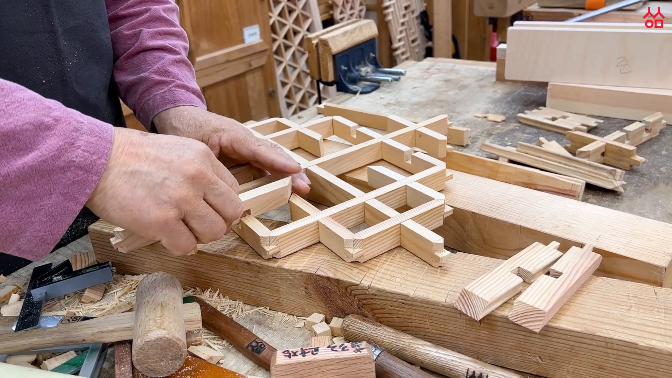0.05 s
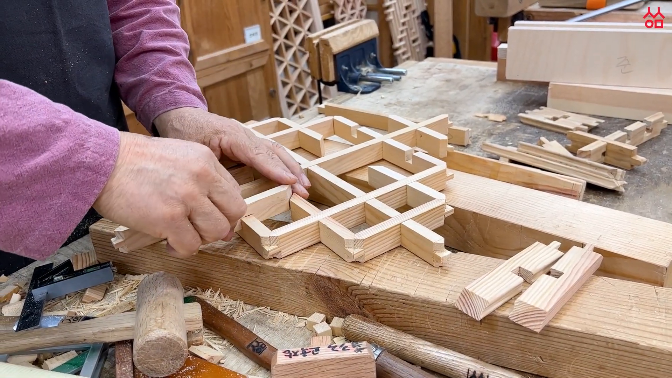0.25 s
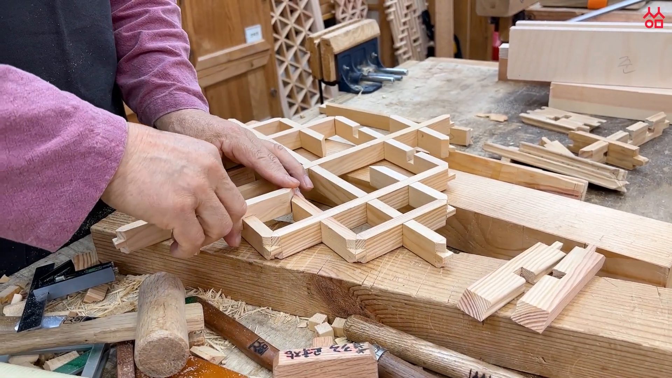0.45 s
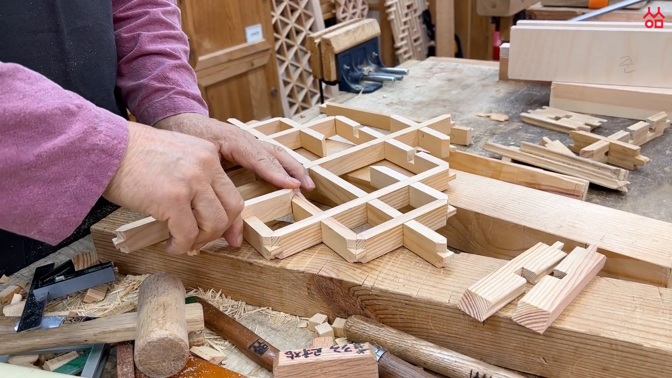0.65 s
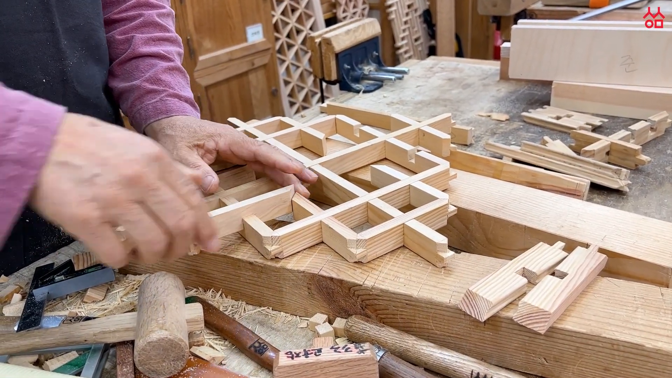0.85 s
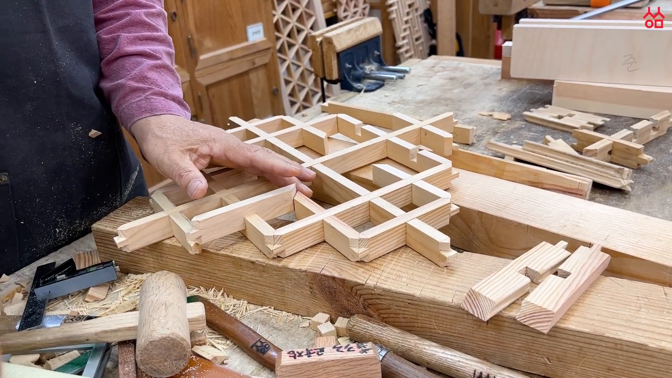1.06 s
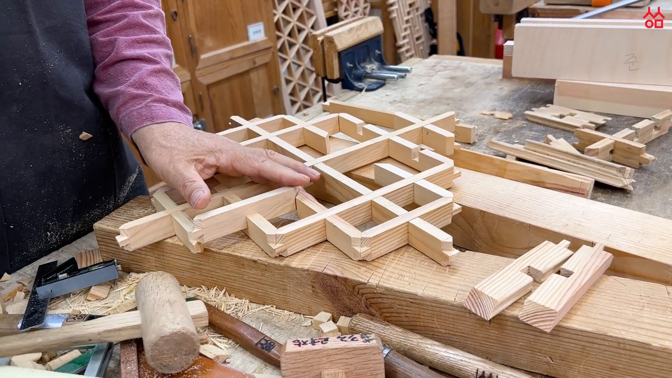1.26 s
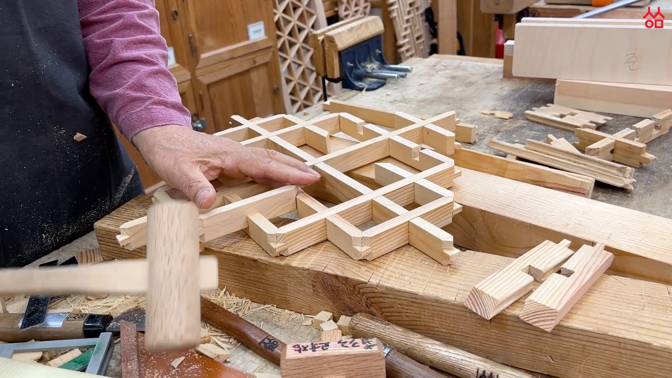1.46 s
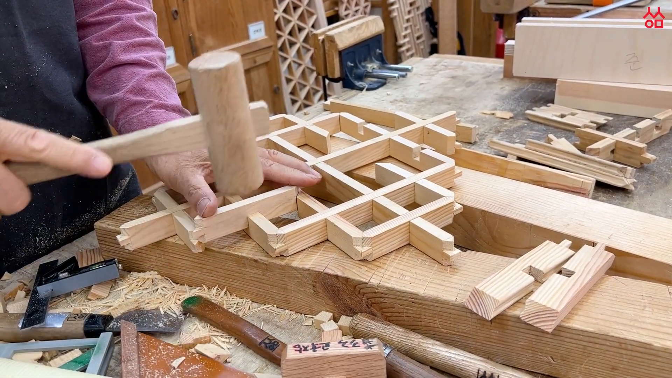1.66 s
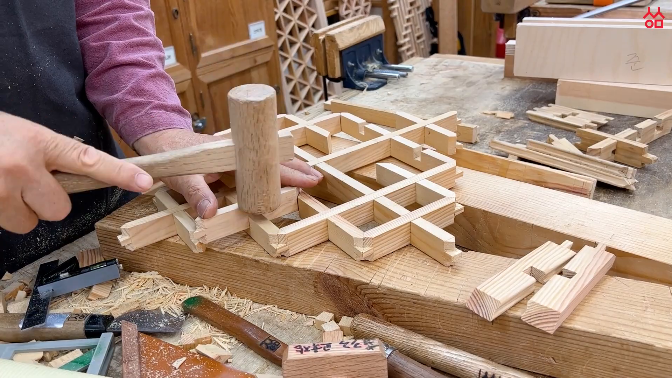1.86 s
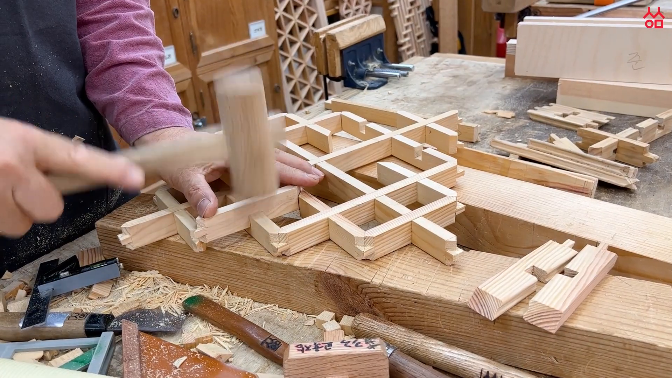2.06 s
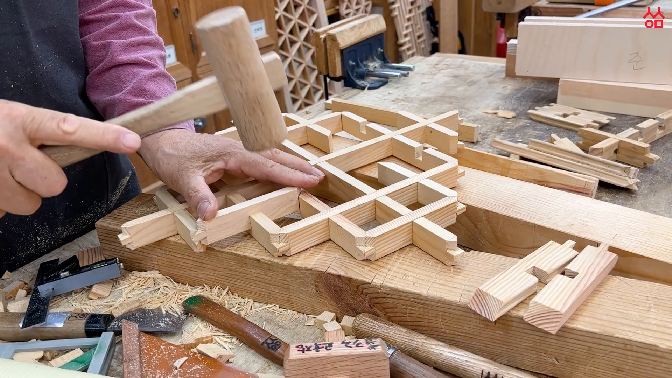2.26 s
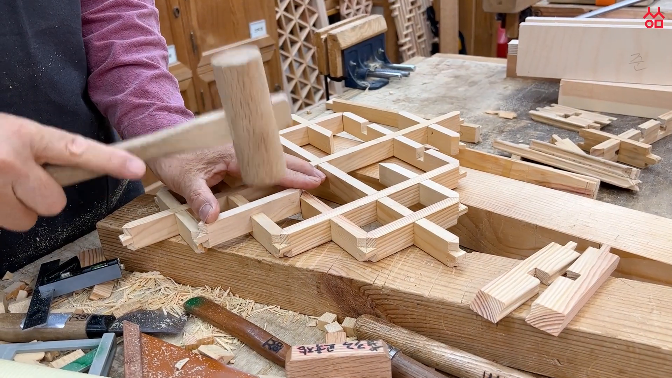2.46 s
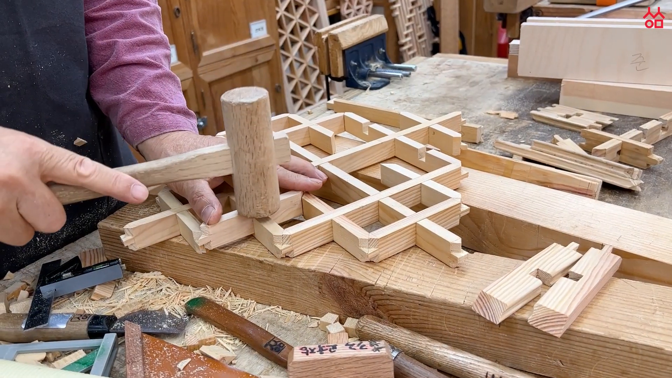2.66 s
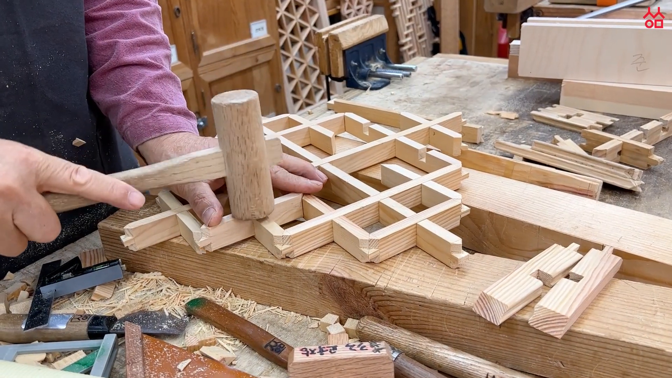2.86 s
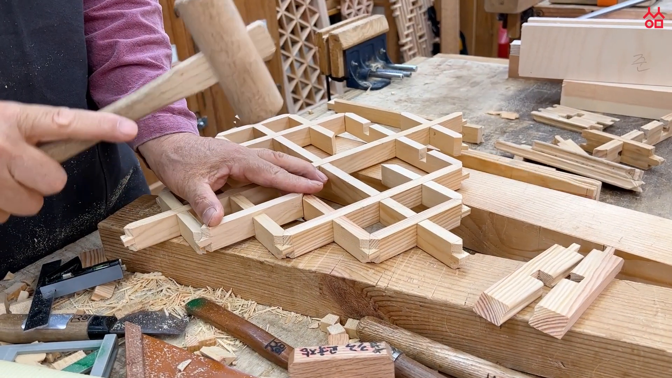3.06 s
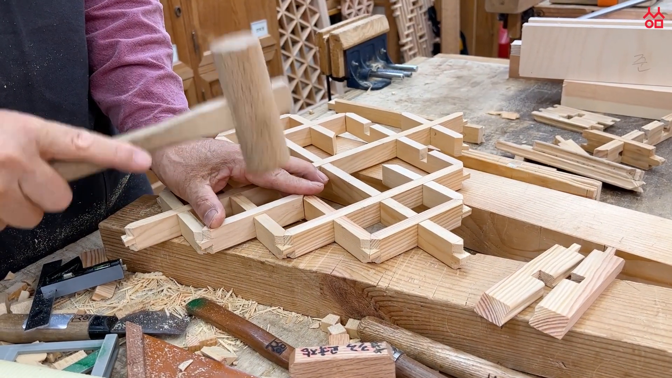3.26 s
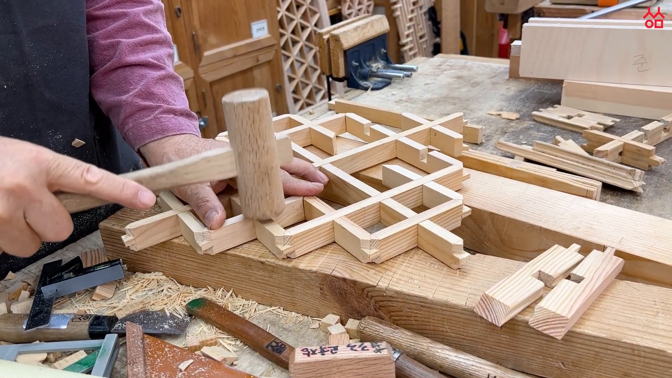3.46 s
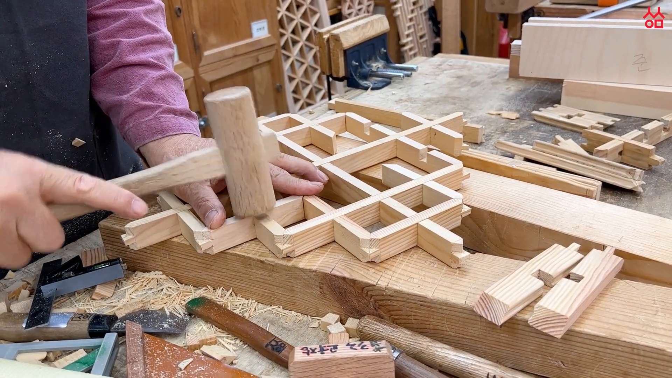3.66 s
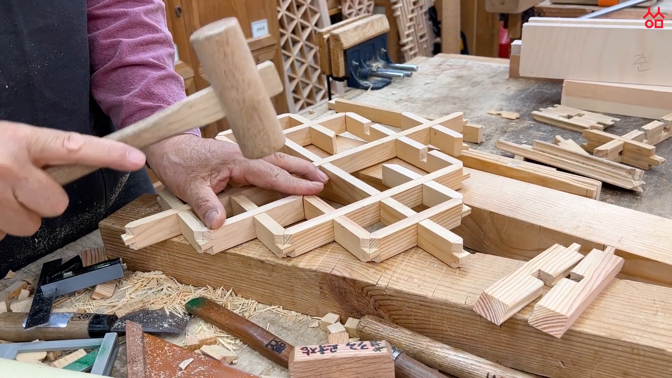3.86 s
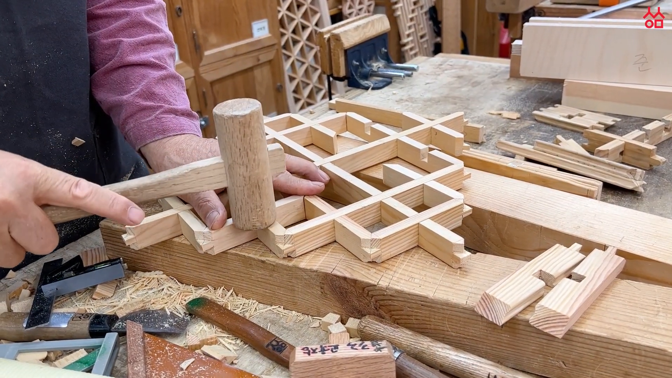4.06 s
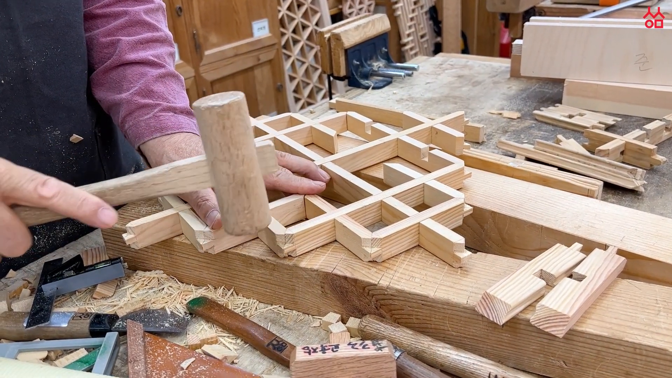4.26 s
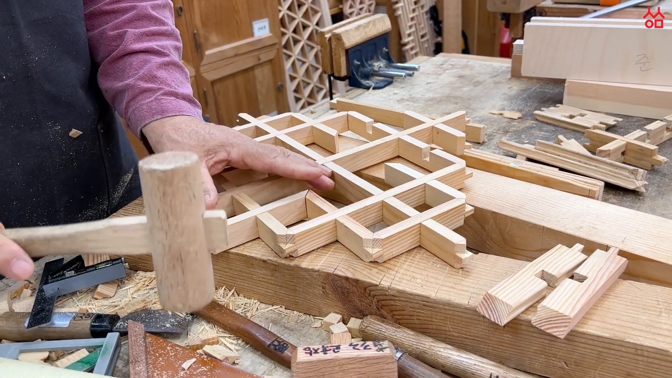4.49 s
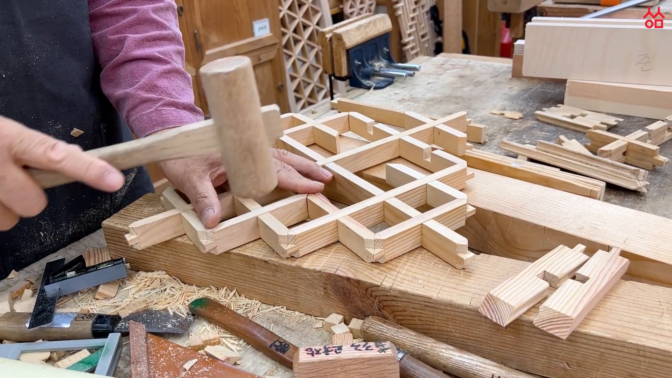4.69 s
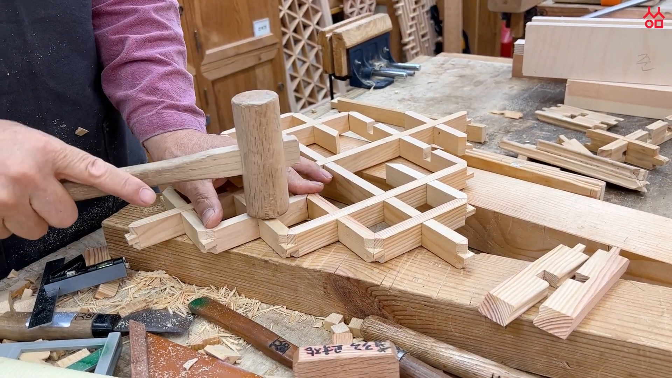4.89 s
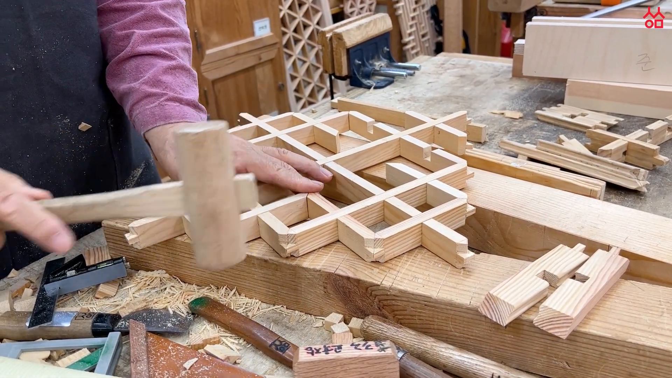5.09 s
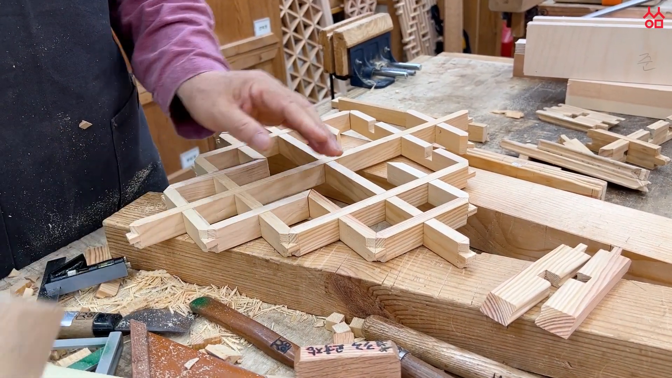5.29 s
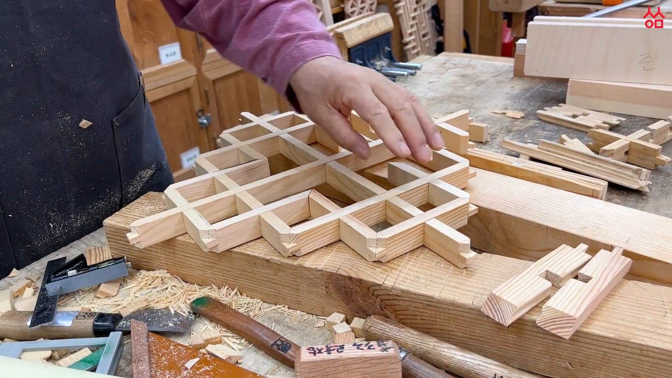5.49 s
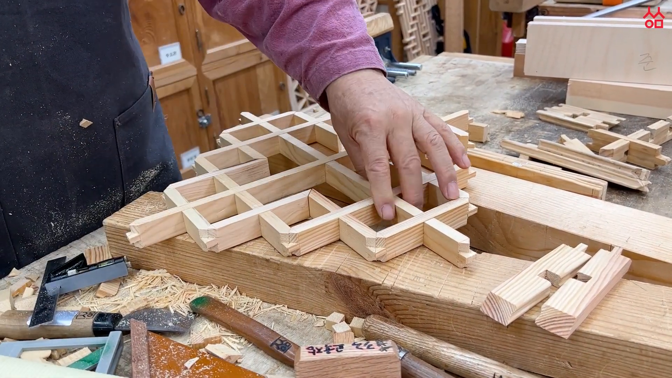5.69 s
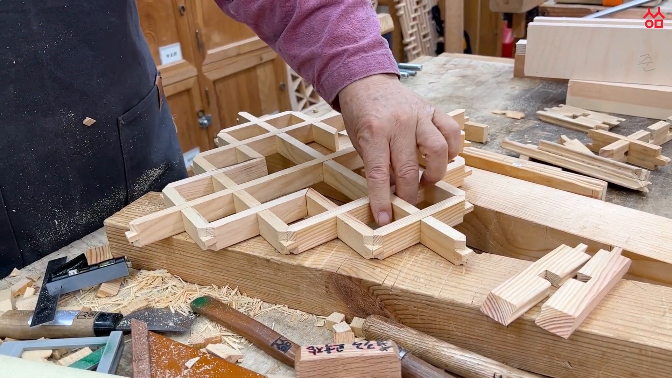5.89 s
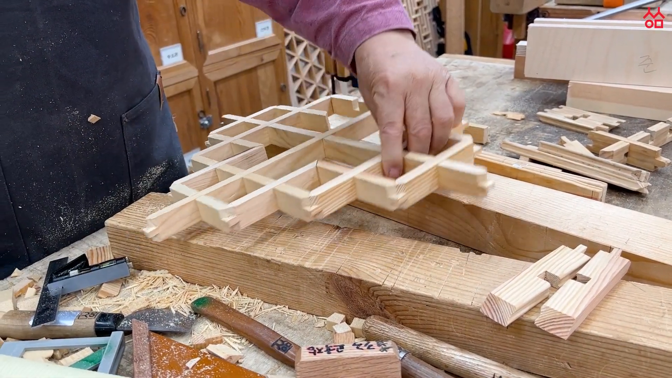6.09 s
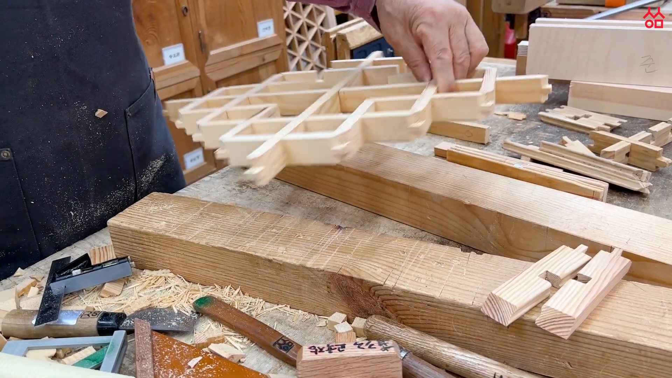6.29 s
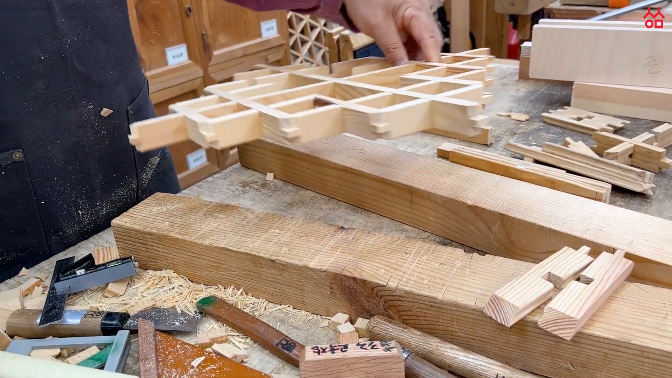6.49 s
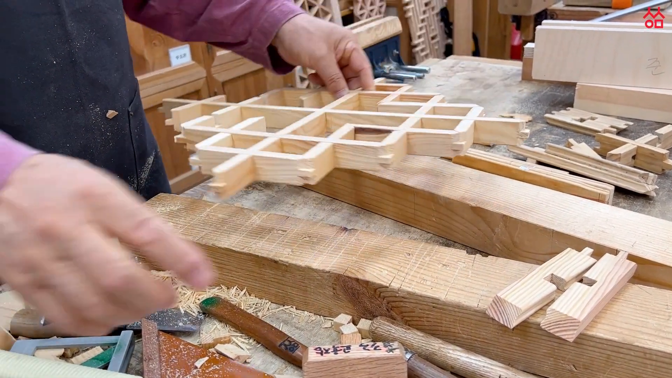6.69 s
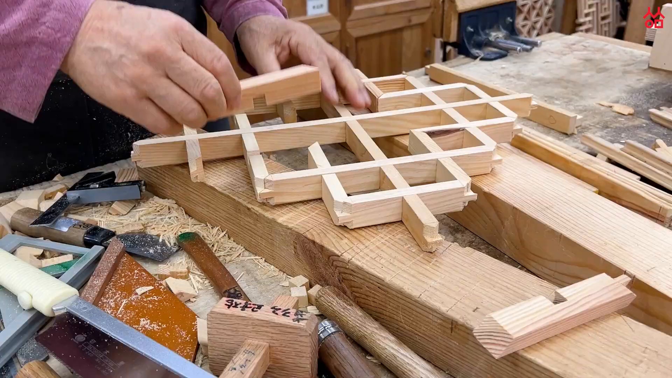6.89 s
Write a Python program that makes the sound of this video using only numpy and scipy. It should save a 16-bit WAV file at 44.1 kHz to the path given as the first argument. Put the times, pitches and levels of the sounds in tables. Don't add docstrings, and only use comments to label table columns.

```python
import sys
import numpy as np
from scipy import signal
from scipy.fft import rfft, irfft
from scipy.io import wavfile
from scipy.ndimage import uniform_filter1d

SR = 44100
rng = np.random.default_rng(int(sys.argv[2]) if len(sys.argv) > 2 else 0)


def to_wav(s):
    ch = np.atleast_2d(s).T
    pcm = np.round(np.clip(ch, -1, 1) * 32767)
    wavfile.write(sys.argv[1], SR, pcm.astype(np.int16))


def ratio_of_db(decibels):
    return 10 ** (np.asarray(decibels, float) / 20)


N = 306054

# frequency in Hz, level in dB per Hz.
AIR = [(18, -42.5), (30, -20.5), (154, -2), (306, -1), (359, -7.5), (420, -1), (979, -6.5), (3570, -7.5),
       (6720, -16.5), (8760, -26.5), (9480, -23.5), (10500, -28.5), (16500, -44.5)]
# frequency in Hz, width in Hz, level in dB.
WHINE = [(5500, 65, -10.5), (6050, 100, -7), (7660, 130, -2), (8660, 270, 5), (10300, 62, -10.5),
         (12530, 58, -27.5), (13500, 110, -35)]
# time in seconds, whine in dB above the air.
MACHINE_LOAD = [(0, -10), (.5, -13.5), (.72, -28), (.9, -27), (1.1, -10.5), (2.5, -12.5), (4.4, -11),
                (5.27, -11.5), (6.3, -9), (6.55, -16), (6.75, -30), (6.94, -27)]
# start in seconds,
# background level in dB, # drift in dB per s.
STRETCHES = [
    (0, -59, 1.5),
    (1.581, -67.5, 0),
    (5.279, -55, -2),
]
# start in seconds, length in seconds, level in dB, centre in Hz, duller part in dB.
RUBS = [(-.05, 0.63, -59, 2140, -8.5), (0.741, 0.22, -46.5, 2780, -4.5), (0.901, 0.18, -56, 2380, -3),
        (1.189, 0.34, -50.5, 2200, -17), (4.4, 0.3, -68.5, 2070, 0), (5.7, 0.6, -57.5, 2100, -7),
        (6.618, .7, -60, 1430, 1.5)]
# start in seconds, end in seconds, frequency in Hz, level in dB.
SQUEAK = (.9, 1.08, 5450, -65)
# time in seconds, level in dB.
CHISEL_HITS = [(5.630, -35.5), (5.676, -37.5)]
GAUGE_HITS = [(5.931, -28), (5.981, -39.5), (6.013, -46)]
# frequency in Hz, level in dB, 60 dB decay in seconds.
CHISEL_MODES = [(5980, 1.5, 0.3), (7670, -11, 0.52), (9600, -7, 0.31), (10560, -13, 0.21),
                (8900, -12, 0.11)]
GAUGE_MODES = [(2260, -1.5, 0.4), (3760, -4.5, 0.14), (1860, 20.5, 0.03), (907, 0.5, 0.095)]
# frequency in Hz, level in dB, 60 dB decay in seconds.
BEAMS = [(124, -18, 0.88), (185.3, -12.5, 0.85), (259, -3.5, 0.41), (345, -6.5, 0.27), (389.7, 0.5, 0.33),
         (504, -4, 0.17), (674, -5.5, 0.24), (767, -8.5, 0.36)]
# frequency in Hz, level in dB per Hz.
WOOD = [(35, -68.5), (60, -44), (113, -9), (213, -15.5), (252, 20.5), (290, -7), (384, 2.5), (600, -4.5),
        (659, -13), (1270, -15), (4980, -21), (15000, -70), (16500, -80)]
# time in seconds, ring in dB, ring in Hz, thud in dB above the ring.
PADDED = [(1.187, -21, 2500, -28), (1.2, -12, 2450, -27), (1.355, -31.5, 1990, 6), (1.36, -8.5, 2400, -42),
          (1.38, -34.5, 2500, 2), (5.564, -15.5, 845, -10.5), (5.931, 0.5, 1830, -27.5),
          (5.979, -9.5, 1690, -23), (6.011, -9.5, 1820, -23)]
FLAT = [(.001, -31.5, 2210, -16), (.106, -31.5, 2260, -37), (0.207, -27, 2260, -18), (.226, -24, 2360, -29),
        (0.258, -36, 1770, -28), (1.22, -30, 2500, 0), (1.287, -34, 1980, -0.5), (1.312, -16, 2210, -22),
        (1.471, -41, 2160, -5), (5.507, -30.5, 895, 7.5), (5.628, -5, 2135, -9), (5.663, -13.5, 1870, -15),
        (5.84, -27.5, 1210, -17), (5.875, -40.5, 934, -4)]
EDGE = [(0.118, -37, 1730, -17), (.237, -36, 2650, -11), (0.249, -33.5, 1700, -8.5),
        (0.446, -39.5, 1800, -9), (.646, -44.5, 915, -7), (1.165, -37.5, 1990, -3),
        (1.239, -13.5, 1800, -40), (1.249, -15.5, 2030, -17), (1.276, -9.5, 1900, -23),
        (1.338, -19.5, 1890, -16), (5.221, -37.5, 870, -13.5), (6.106, -31.5, 1650, -37)]
TICK = [(1.55, -48, 2070, -4.5), (1.772, -46, 1140, -11.5), (4.649, -52, 1782, -42.5),
        (4.843, -60, 1620, 5), (5.646, -19.5, 1900, -9), (5.674, -23.5, 2110, 1), (5.7, -17, 2150, -56),
        (5.717, -19.5, 2170, -59), (6.537, -45, 910, 3)]
CRISP = [(0.884, -39, 1000, -1), (6.424, -46, 2454, -22), (6.513, -56, 2460, -16), (6.561, -40, 1760, -14)]
# click in Hz, click in dB above the ring, its knocks.
CONTACTS = [
    (3060, -35.5, PADDED),
    (3130, -18, FLAT),
    (3100, -13.5, EDGE),
    (3490, -8.5, TICK),
    (4020, -2, CRISP),
]
# time in
# seconds, bar ring in dB, bar in Hz, click in dB above the bar, seated in dB (more passes to bench and room).
JOINTS = [
    (3357, -19, [(1.847, -8, 1880, -21.5, -4.5), (2.097, -5, 1780, -10.5, -4), (2.363, -5.5, 1770, -9.5, -2)]),
    (5260, -18, [(2.627, -5, 1640, -5.5, -2.5), (2.882, -5, 1604, -5, -1), (3.141, -3.5, 1687, -6, -1.5), (3.418, -3.5, 1800, -7.5, 0.5)]),
    (2800, -19.5, [(3.687, 3.5, 1774, -18, 2.5), (3.933, 3.5, 2042, -12, -1.5)]),
    (3240, -10, [(4.066, -19.5, 1704, -24, -2.5), (4.078, -21.5, 1700, -17, 0)]),
    (2620, -15, [(4.861, -3, 1750, -19.5, -3.5)]),
]
# delay in ms, level in dB.
SLAPS = [(11.5, -17), (16, -19), (19.5, -19), (23, -19), (31, -25)]
# frequency in Hz, 60 dB decay in seconds.
ROOM_T60 = [(60, 0.34), (160, 0.57), (420, 0.52), (1100, 0.46), (2500, 0.36), (4300, 0.44), (5500, 0.25),
            (6600, 0.67), (9000, 0.33), (14000, 0.11)]
# frequency in Hz, level in dB.
ROOM_DB = [(60, -48.5), (110, -33.5), (180, -35), (250, -27), (400, -24.5), (700, -24.5), (1200, -32),
           (1800, -23.5), (2800, -25.5), (4300, -22.5), (5500, -19), (6600, -40.5), (10000, -40.5),
           (15000, -52)]


def level(x, db):
    return x * ratio_of_db(db) / np.sqrt(np.mean(x ** 2))


def along(points, hz):
    points_hz, values = np.array(points).T
    return np.interp(np.log(np.maximum(hz, 1)), np.log(points_hz), values)


def coloured(size, points):
    gain = ratio_of_db(along(points, np.fft.rfftfreq(size, 1 / SR)))
    return level(irfft(rfft(rng.standard_normal(size)) * gain, size), 0)


def band(x, lo_hz, hi_hz):
    edges = [lo_hz, min(hi_hz, .49 * SR)]
    return signal.sosfilt(signal.butter(2, edges, "bandpass", fs=SR, output="sos"), x)


def highpass(x, order, hz):
    return signal.sosfilt(signal.butter(order, hz, "highpass", fs=SR, output="sos"), x)


def sine(t, hz):
    return np.sin(2 * np.pi * hz * t)


def fade(t, t60):
    return np.exp(-np.log(1000) * t / t60)


def ring(t, hz, t60, rise):
    return (1 - np.exp(-t / rise)) * fade(t, t60) * sine(t, hz)


def swell(t, peak_s):
    return t / peak_s * np.exp(1 - t / peak_s)


def add(out, s, sound):
    i = int(s * SR)
    out[i:i + len(sound)] += sound[:N - i]


def walk(rate):
    k = int(SR / rate)
    return uniform_filter1d(np.repeat(rng.standard_normal(N // k + 1), k), k)[:N]


def shop():
    flutter_db = 2
    t = np.arange(N) / SR
    columns = np.transpose(STRETCHES)
    start, air_db, drift_db = columns[:, np.searchsorted(columns[0][1:], t)]
    whine = np.zeros(N)
    for hz, width, db in WHINE:
        line = band(rng.standard_normal(N), hz - width / 2, hz + width / 2)
        whine += level(line, db) * ratio_of_db(flutter_db * walk(4.0))
    air = coloured(N, AIR) * ratio_of_db(flutter_db / 2 * walk(1.8))
    load = ratio_of_db(np.interp(t, *np.transpose(MACHINE_LOAD)))
    return (air + whine * load) * ratio_of_db(air_db + drift_db * (t - start))


def rubbing():
    wide = 1.2
    rumble_db = -6.5
    grip_s, let_go_s, growth_db = 0.027, 0.078, 0.5
    out = np.zeros(N)
    for s, length, db, hz, dull_db in RUBS:
        t = np.arange(max(-s, 0) * SR, length * SR) / SR
        slips = rng.standard_normal(len(t)) * ratio_of_db(2.24 * rng.exponential(size=len(t)))
        body = band(slips, hz / wide, hz * wide ** 2)
        body += 0.23 * (hz / 2800) ** 3 * band(slips, 3400, 6400)
        body += ratio_of_db(dull_db) * band(slips, 620, 1270)
        body += 3 * ratio_of_db(rumble_db) * band(slips, 84, 300)
        stroke = np.clip(np.minimum(t / grip_s, (length - t) / let_go_s), 0, 1) ** 2
        add(out, max(s, 0), level(body, db) * stroke * ratio_of_db(growth_db * t / length))
    start, end, hz, db = SQUEAK
    size = int((end - start) * SR)
    squeak = band(rng.standard_normal(size), hz - 160, hz + 160)
    add(out, start, level(squeak, db) * np.hanning(size))
    return out * ratio_of_db(3.0 * walk(40))


def steel(hits, modes):
    out, t = np.zeros(N), np.arange(SR // 2) / SR
    for s, db in hits:
        add(out, s, ratio_of_db(db) * sum(ratio_of_db(g) * ring(t, hz, t60, 0.000091) for hz, g, t60 in modes))
    return out


def beam_thud(t, beam_share):
    thud = np.zeros(len(t))
    for hz, db, t60 in BEAMS:
        db_off, hz_off = rng.standard_normal(2)
        thud += ratio_of_db(db + 2.5 * db_off) * ring(t, hz * (1 + 0.005 * hz_off), beam_share * t60, 0.0022)
    return thud


def strikes(hits, seated_db, lag, bar_s, click_s, crack_s, crack_db, tick_db, thud_db, head, thump, after,
            beam_share):
    head_hz = 3460
    out = np.zeros(N)
    t = np.arange(int(2048 + .4 * beam_share * SR)) / SR
    short = t[:2048]
    for (s, db, bar_hz, click_hz, low_db, high_db), held_db in zip(hits, seated_db):
        crack = coloured(len(short), WOOD) * swell(short, crack_s) * ratio_of_db(crack_db)
        pair = sine(short, bar_hz) + 0.66 * sine(short, bar_hz * rng.uniform(0.683, 1.0))
        bar = 0.41 * ratio_of_db(-1.2 * held_db) * swell(short, bar_s) * pair
        bar += band(crack, 970, 3500)
        bar += after * ring(short, bar_hz, .07, .001)
        bar += after * ratio_of_db(high_db + 8.5) * ring(short, click_hz, .05, 0.00092)
        click = 1.4 * swell(short, click_s) * sine(short, click_hz)
        click += 4 * band(crack, 2200, 12000)
        tick = rng.standard_normal(len(short)) * swell(short, crack_s / 2)
        click += ratio_of_db(tick_db) * band(tick, 3000, 9100)
        click += head * swell(short, 1.1 * click_s) * sine(short, head_hz)
        thud = beam_thud(t, beam_share)
        thud[:len(short)] += 3 * band(crack, 240, 890)
        thud[:len(short)] += thump * swell(short, 0.0013) * sine(short, 390)
        add(out, s + lag, ratio_of_db(db) * (bar + ratio_of_db(high_db + 5.5) * click))
        add(out, s + lag, ratio_of_db(db + low_db + thud_db) * thud)
    return out


def echoes(hits, light, seated_db):
    delay_s, light_db, hump_db, hump_octaves = 0.0064, -8.0, 4, 0.21
    third = 1.13
    s, db, bar_hz, click_hz, low_db, high_db = np.transpose(hits)
    arrival = ((s + delay_s) * SR).astype(int)
    out, rattle = np.zeros(N), ratio_of_db(1.3 * walk(250))
    for hz in 63 * 2 ** np.arange(0, 8.1, 1 / 3):
        low, high = 1 / (1 + (hz / 800) ** 4), 1 / (1 + (2500 / hz) ** 6)
        hump = sum(np.exp(-(np.log2(hz / f) / hump_octaves) ** 2) for f in (bar_hz, click_hz))
        light_loss_db = light_db - 8 / (1 + (hz / 200) ** 4) - 5 / (1 + (4500 / hz) ** 4)
        hit_db = db + seated_db + light * light_loss_db
        hit_db = hit_db + low * (low_db + 12.5) + high * (high_db + 7)
        hit_db = hit_db + hump_db * (1 + light) * hump
        power = np.zeros(N)
        np.add.at(power, arrival, ratio_of_db(hit_db) ** 2)
        late = signal.lfilter([1], [1, -fade(2 / SR, along(ROOM_T60, hz))], power)
        early = signal.lfilter([1], [1, -fade(2 / SR, 0.013)], power)
        fill = signal.lfilter([.01], [1, -.99], late + 1.5 * early)
        tail = band(rng.standard_normal(N) * np.sqrt(fill) * rattle, hz / third, hz * third)
        out += tail * ratio_of_db(along(ROOM_DB, hz)) * np.sqrt(2 * SR / hz)
    return out


def scene():
    mallet, seated_db, parts = [], [], []
    for click_hz, low_db, rows in JOINTS:
        for s, db, hz, high_db, held_db in rows:
            mallet.append((s, db, hz, click_hz, low_db, high_db))
            seated_db.append(held_db)
    for click_hz, high_db, rows in CONTACTS:
        parts += [(s, db, hz, click_hz, low_db, high_db) for s, db, hz, low_db in rows]
    loose_db = np.zeros(len(parts))
    blows = strikes(mallet, seated_db, lag=.001, bar_s=.002, click_s=0.00054, crack_s=0.001, crack_db=5,
                    tick_db=-14.5, thud_db=3, head=0.97, thump=2.5, after=.03, beam_share=0.51)
    knocks = strikes(parts, loose_db, lag=0.00181, bar_s=0.0012, click_s=0.00045, crack_s=0.0019, crack_db=-3.5,
                     tick_db=-1.5, thud_db=3.5, head=0.25, thump=0.19, after=0.27, beam_share=0.19)
    slaps = sum(ratio_of_db(db) * np.roll(blows, int(ms * SR / 1000)) for ms, db in SLAPS)
    near = ratio_of_db(1.5) * (blows + slaps) + ratio_of_db(-6.0) * highpass(knocks, 2, 170)
    near += steel(CHISEL_HITS, CHISEL_MODES) + steel(GAUGE_HITS, GAUGE_MODES)
    hits = mallet + parts
    light = np.arange(len(hits)) >= len(mallet)
    near += echoes(hits, light, np.append(seated_db, loose_db))
    near = highpass(near, 4, 95)
    return (near + rubbing() + shop())[None]


def low_pass(x):
    return signal.sosfilt(signal.butter(12, 16960, fs=SR, output="sos"), x)


def record(dry):
    knee = 4
    x = dry / (1 + np.abs(dry) ** knee) ** (1 / knee)
    x = signal.sosfilt(signal.butter(1, 12000, fs=SR, output="sos"), x)
    x = signal.sosfilt(signal.ellip(8, .2, 60, 16600, fs=SR, output="sos"), x)
    x = .85 * highpass(x, 2, 45)
    return low_pass(x)


dry = scene()
out = record(dry)
to_wav(out)
```